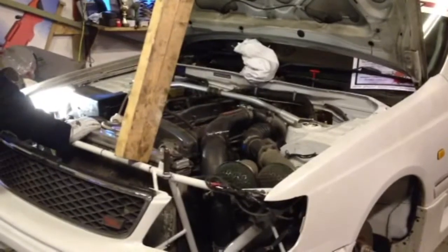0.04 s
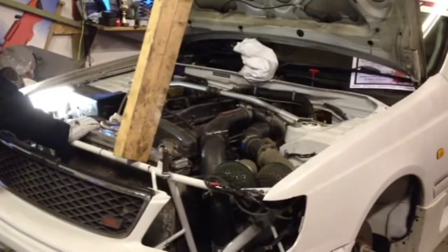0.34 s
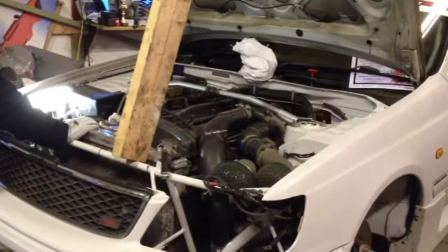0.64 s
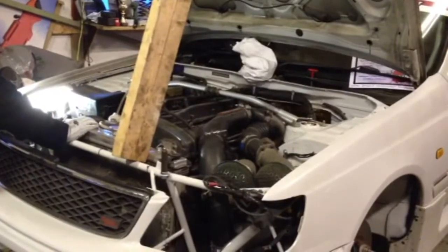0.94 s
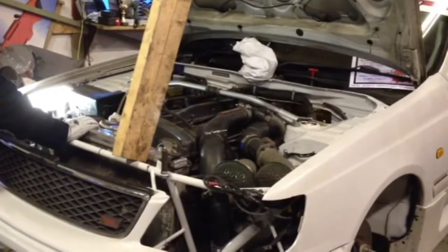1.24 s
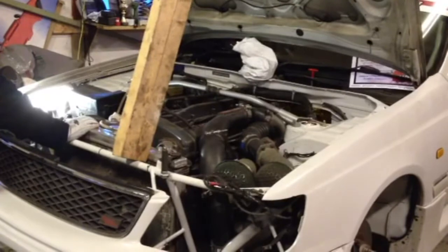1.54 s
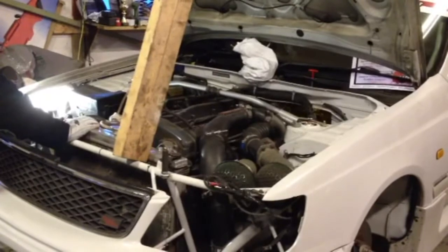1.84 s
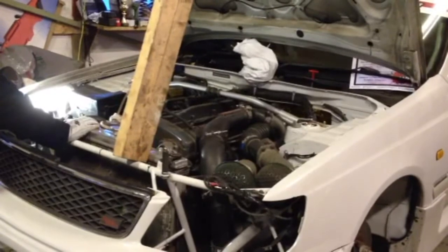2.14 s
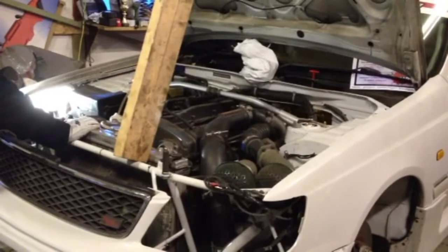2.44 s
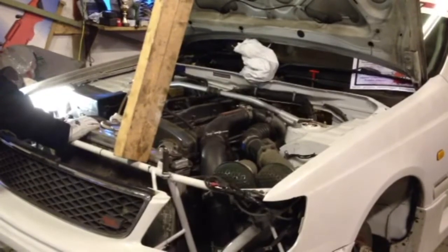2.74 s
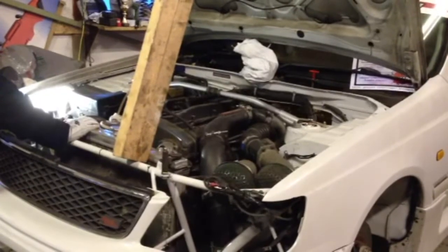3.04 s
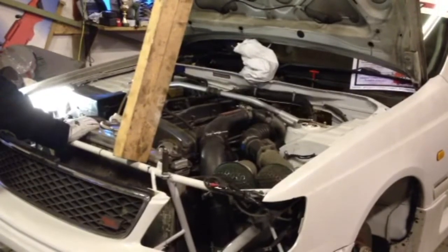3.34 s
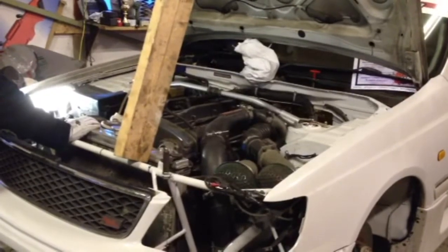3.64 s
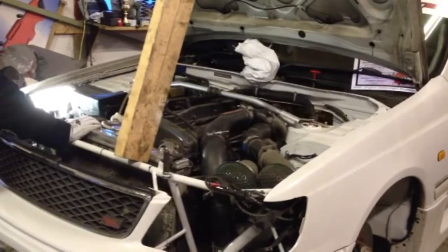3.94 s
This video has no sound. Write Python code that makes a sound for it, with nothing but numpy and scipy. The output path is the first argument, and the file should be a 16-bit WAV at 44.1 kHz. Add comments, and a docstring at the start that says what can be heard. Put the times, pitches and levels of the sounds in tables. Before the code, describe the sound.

A starter motor cranks a car engine in a garage, heard beside the open hood. First the ignition key clicks on and off and a fuel pump whines faintly, then the starter clunks in and turns with rapid, rattling pulses.

```python
"""A starter motor cranks a car engine in a garage, heard over the open bonnet.
The solenoid slams the pinion in; gear teeth rattle the engine's metal and labour against each
compression as the speed rises. Before that, a fuel pump whines, the key clicks on and off twice
and two soft scuffs pass. Room air and faint whistles lie underneath."""
import sys
import numpy as np
from scipy import signal
from scipy.fft import rfft, irfft
from scipy.io import wavfile

SR = 44100
rng = np.random.default_rng(int(sys.argv[2]) if len(sys.argv) > 2 else 0)


def to_wav(s):
    """Save 16-bit WAV."""
    ch = np.atleast_2d(s).T  # columns
    pcm = np.round(np.clip(ch, -1, 1) * 32767)  # PCM
    wavfile.write(sys.argv[1], SR, pcm.astype(np.int16))


N = 176400
T = np.arange(N) / SR

# cranking (time [s], unloaded tooth rate [Hz], gear level [dB])
CRANKING = [(2.5, 504, -26.5), (2.53, 601, -19.5), (2.61, 640, -26.5), (2.72, 1000, -24), (2.79, 1200, -23),
            (2.87, 1260, -27), (2.94, 1260, -26.5), (3.15, 1340, -25), (3.44, 1380, -24.5),
            (3.85, 1470, -25.5), (3.92, 1470, -23), (4, 1498, -23.5)]
# compression strokes (time [s], level [dB], length [s])
COMPRESSIONS = [(2.756, -24.5, .06), (2.922, -22.5, .038), (3.055, -21, .028), (3.178, -20.5, .036),
                (3.297, -25, .04), (3.413, -21, .044), (3.521, -18.5, .031), (3.64, -22, .033),
                (3.749, -21.5, .029), (3.86, -21.5, .042), (3.971, -34.5, .02)]
# bright rattle (time [s], level [dB])
RATTLE_LEVEL = [(2.5, -24), (2.62, -40), (2.71, -33), (2.85, -35), (2.9, -27), (3.05, -27), (3.22, -25),
                (3.5, -26), (3.88, -26), (3.925, -20.5), (4, -23)]
# solenoid and pinion blows (time [s], level [dB])
SOLENOID_BLOWS = [(2.507, -45), (2.518, -16.5), (2.537, -23.5)]
# relays closing, key on (time [s], level [dB])
RELAY_SNAPS = [(0.353, -29), (0.59, -30)]
# relays opening, key off (time [s], level [dB])
RELAY_RELEASES = [(.477, -40.5), (.72, -40.5)]
# car body knocks (time [s], level [dB])
BODY_KNOCKS = [(0.31, -43), (.356, -42.5), (0.488, -40.5), (0.526, -43), (0.598, -39.5), (.729, -39),
               (0.767, -44.5), (1.19, -50.5), (2.397, -51)]
# soft rubs (time [s], level [dB], centre [Hz])
SOFT_SCUFFS = [(2.335, -55.5, 3200), (2.395, -60, 8000)]
# pump tones (shaft rate multiple [1], relative level [dB])
PUMP_HARMONICS = [(1, -8.5), (2, -4.5), (4, -4.5), (8, -1), (12, -12), (16, -8.5)]
# pump whine (time [s], level [dB])
PUMP_ENVELOPE = [(.33, -60), (.42, -59), (.76, -60.5), (.86, -60), (1.4, -61), (1.5, -62.5), (1.6, -60),
                 (2.25, -60), (2.45, -61)]
# faint whistles (frequency [Hz], level [dB])
WHISTLE_TONES = [(119.5, -71.5), (549, -66), (5367, -72.5), (11714, -75.5)]

# source spectra (frequency [Hz], relative gain [dB])
GEAR_SPECTRUM = [(25, -47), (62, -30), (90, -33), (140, -13), (250, -7), (660, -5), (790, -6.5), (1000, -3),
                 (1500, 0), (2000, 0), (3600, -1), (4100, -6.5), (5400, -6), (8000, -12.5), (10000, -21),
                 (15500, -30)]
GRIND_SPECTRUM = [(60, -41), (200, -14), (400, -10), (620, -5.5), (790, -7.5), (1000, -7.5), (1290, 0),
                  (1520, -2.5), (2100, -4.5), (3300, -6.5), (4300, -6.5), (7800, -16.5), (10000, -25),
                  (15000, -35)]
THUD_SPECTRUM = [(25, -41), (45, -36), (65, -16), (90, -34), (130, -14), (200, 1.5), (400, 4), (630, -2.5),
                 (900, -47), (3000, -72)]
RATTLE_SPECTRUM = [(500, -38), (2000, -0.5), (3300, -1), (4500, -6.5), (6200, 3.5), (8000, -1), (9000, -5),
                   (10200, -11), (12500, -10.5), (15500, -19)]
SOLENOID_SPECTRUM = [(50, -54), (90, -28), (200, -9), (450, -4), (700, -14), (1300, -5), (2000, -10.5),
                     (3200, -2), (4300, -7.5), (5500, -12), (6300, -3), (7900, -17), (9500, -8.5),
                     (11000, -21), (12500, -11), (15200, -26)]
SNAP_SPECTRUM = [(60, -45), (200, -26), (400, -6), (750, -15), (1080, 0), (1500, -15), (1900, -2.5),
                 (2500, -7.5), (3100, 1.5), (3900, -3), (4600, -9), (8500, -21.5), (10500, -23.5),
                 (12800, -13), (15300, -27)]
RELEASE_SPECTRUM = [(200, -17), (1000, -9), (2500, 0), (4700, 0), (6500, -3.5), (8300, -3.5), (10500, -13),
                    (13000, -10), (15300, -22)]
KNOCK_SPECTRUM = [(60, -40), (180, -10), (320, 4.5), (600, -2.5), (790, -14), (2200, -14), (8000, -46)]
AIR_SPECTRUM = [(25, -33), (42, -28), (60, -17), (78, -20), (120, -17), (155, -12), (200, 1.5), (310, -6),
                (390, 0), (500, -2), (620, -9.5), (780, -10.5), (1500, -12), (2000, -13), (2700, -18),
                (6800, -14.5), (8500, -23), (15300, -28)]
# engine metal and car body resonances (frequency [Hz], width [Hz], lift [dB])
ENGINE_MODES = [(371, 6.2, 13.5), (631, 24, 7), (1000, 36, 7), (1783, 56, 3.5), (1862, 31, 4),
                (2054, 21, 7), (2140, 110, 5), (2360, 45, 1.5), (2736, 40, 5), (3273, 80, 5.5),
                (3510, 41, 6), (3748, 58, 5.5), (4665, 110, 7), (5460, 63, 6), (6100, 78, 0), (6900, 14, 3),
                (7700, 67, 10), (7800, 30, 5.5), (8460, 36, 10.5)]
BODY_MODES = [(356, 60, 4), (592, 76, 6.5)]
# garage decay (frequency [Hz], T60 [s])
GARAGE_T60 = [(100, 0.42), (500, 0.54), (2000, 0.41), (3500, 0.37), (7000, 0.27), (15000, 0.25)]


def starter(start_s=2.504):
    """Meshing teeth strike the metal; each compression slows them and makes them grind harder."""
    running = burst(start_s, .011, 2, 1)
    effort = sum(amp(db) * burst(s, .0043, length_s, .0088) for s, db, length_s in COMPRESSIONS)
    teeth = tooth_cycles()
    contact = unit(.47 + np.exp(-(teeth % 1) / .12))  # one pulse per tooth
    mesh = unit(contact * grains(14000, 2.7) * amp(flutter(2, 113)))
    gear_gain = running * amp(curve(CRANKING, column=2) + flutter(1.75, 47))
    gears = colour(gear_gain * mesh, GEAR_SPECTRUM, ENGINE_MODES)
    grind_force = effort * contact * grains(9000, 4.5) * amp(flutter(1.8, 100))
    grind = colour(grind_force, GRIND_SPECTRUM, ENGINE_MODES)
    return gears + grind + gear_whine(teeth, effort, running) + thuds(effort) + rattle(running)


def tooth_cycles(sag_depth=.17, sag_onset_s=.042, ease_per_s=.75):
    """Teeth passed. Speed sags on each compression, less as the engine gains momentum."""
    strokes = sum(burst(s, sag_onset_s, length_s + .015, .022) for s, _, length_s in COMPRESSIONS)
    load = strokes * np.exp(-ease_per_s * (T - COMPRESSIONS[1][0]))
    tooth_hz = curve(CRANKING) * (1 - sag_depth * np.minimum(load, 1))
    return np.cumsum(tooth_hz * (1 + .008 * drift(80))) / SR


def gear_whine(teeth, effort, running, loaded_db=-29.5, free_db=-44):
    """Tone at the tooth rate, louder under compression."""
    tone = unit(np.sin(2 * np.pi * teeth)) * amp(flutter(6.1, 63))
    return tone * (amp(loaded_db) * effort / effort.max() + amp(free_db) * running)


def thuds(effort, growth_db_per_s=8.5):
    """One low thud per compression, swelling over time."""
    swell = amp(-12.5 + growth_db_per_s * (T - COMPRESSIONS[5][0]))
    return colour(effort * swell * grains(4000, 2.2), THUD_SPECTRUM)


def rattle(running):
    """Dense small impacts ring the engine's metal."""
    gain = running * amp(curve(RATTLE_LEVEL) + flutter(4.26, 41))
    return colour(gain * grains(8000, 6.8), RATTLE_SPECTRUM, ENGINE_MODES)


def solenoid():
    """The plunger moves; the pinion slams into the ring gear."""
    blows = bursts(SOLENOID_BLOWS, .003, .0045, .0085) * grains(12000, 1.9)
    return colour(blows, SOLENOID_SPECTRUM)


def ignition_key():
    """Relay contacts chatter briefly; the body answers with dull knocks."""
    snaps = bursts(RELAY_SNAPS, .006, .019, .0026) * grains(9300, 3.6)
    releases = bursts(RELAY_RELEASES, .004, .0096, .023) * grains(9000, 3.3)
    knocks = bursts(BODY_KNOCKS, .003, .015, .0092) * grains(2500, 3.2)
    clicks = colour(snaps, SNAP_SPECTRUM) + colour(releases, RELEASE_SPECTRUM)
    body = colour(knocks, KNOCK_SPECTRUM, BODY_MODES)
    return garage(clicks, wet_db=-3.5) + garage(body, wet_db=-1)


def scuffs():
    """Soft rubbing just before the starter engages."""
    rubs = np.zeros(N)
    for s, db, hz in SOFT_SCUFFS:
        friction = amp(db) * burst(s, .02, .044, .024) * grains(7400, 4)
        rubs += colour(friction, [(hz / 4, -18), (hz, 0), (hz * 2, -12)])
    return rubs


def fuel_pump(shaft_hz=240.95, stop_s=2.46):
    """Wavering shaft harmonics; stops just before cranking."""
    turns = np.cumsum(shaft_hz * (1 + .0006 * drift(7.5))) / SR
    whine = sum(amp(db + .5 * drift(20)) * np.sin(2 * np.pi * (k * turns + rng.random()))
                for k, db in PUMP_HARMONICS)
    powered = burst(-1, .01, 1 + stop_s, .017)
    return np.sqrt(2) * whine * amp(curve(PUMP_ENVELOPE)) * powered


def whistles():
    """Faint tones, wandering in level and phase."""
    return np.sqrt(2) * sum(amp(db + 2.2 * drift(6.2)) * np.sin(2 * np.pi * hz * T + .6 * drift(15))
                            for hz, db in WHISTLE_TONES)


def room_air(level_db=-54.5):
    """Soft noise, slowly wavering."""
    return amp(level_db + .86 * drift(1.7)) * colour(rng.standard_normal(N), AIR_SPECTRUM)


def garage(x, wet_db, predelay_samples=130):
    """Adds dense reflections; each band decays at its own rate."""
    hz, t, bands = signal.stft(rng.standard_normal(SR // 2), SR, nperseg=256)
    decay = amp(-60 * t / at_hz(GARAGE_T60, hz)[:, None])
    tail = signal.istft(bands * decay, SR, nperseg=256)[1]
    tail[:predelay_samples] = 0
    wet = signal.fftconvolve(x, tail / np.linalg.norm(tail))[:N]
    return (x + amp(wet_db) * wet) / np.sqrt(1 + amp(wet_db) ** 2)


def amp(db):
    """dB to gain."""
    return 10 ** (np.asarray(db) / 20)


def unit(x):
    """Scales to rms 1."""
    return x / np.sqrt(np.mean(x ** 2) + 1e-20)


def at_hz(points, hz):
    """Table lookup, log-frequency axis."""
    f, value = np.transpose(points)
    return np.interp(np.log(hz + 1), np.log(f + 1), value)


def curve(points, column=1):
    """Time table column, per sample."""
    columns = np.transpose(points)
    return np.interp(T, columns[0], columns[column])


def drift(cutoff_hz):
    """Low-passed random wander, rms 1."""
    f = np.fft.rfftfreq(N, 1 / SR)
    return unit(irfft(rfft(rng.standard_normal(N)) / (1 + (f / cutoff_hz) ** 4), N))


def flutter(limit_db, cutoff_hz):
    """Bounded level wander [dB]."""
    return limit_db * np.tanh(drift(cutoff_hz))


def colour(x, spectrum, modes=()):
    """Minimum-phase filter, energy 1: broad spectrum plus resonances."""
    f = np.fft.rfftfreq(8192, 1 / SR)
    lift = 1 + sum((amp(db) ** 2 - 1) / (1 + (2 * (f - hz) / width_hz) ** 2)
                   for hz, width_hz, db in modes)
    log_gain = np.log(amp(at_hz(spectrum, f))) + .5 * np.log(np.maximum(lift, 1e-3))
    log_response = signal.hilbert(np.r_[log_gain, log_gain[-2:0:-1]]).conj()
    taps = np.fft.ifft(np.exp(log_response)).real[:4096]
    return signal.fftconvolve(x, taps / np.linalg.norm(taps))[:N]


def grains(per_s, scatter_db):
    """Random tiny impacts of uneven size, rms 1."""
    impacts = (rng.random(N) < per_s / SR) * rng.choice([-1, 1], N)
    return unit(impacts * amp(scatter_db * rng.uniform(-1, 1, N)))


def burst(start_s, rise_s, hold_s, fall_s):
    """Linear rise; exponential fall from start_s + hold_s."""
    age_s = T - start_s
    return np.clip(age_s / rise_s, 0, 1) * np.exp(-np.maximum(age_s - hold_s, 0) / fall_s)


def bursts(events, rise_s, hold_s, fall_s):
    """One burst per (time [s], level [dB])."""
    return sum(amp(db) * burst(s, rise_s, hold_s, fall_s) for s, db in events)


def scene():
    """Mono mix beside the engine bay."""
    quiet_layers = room_air() + fuel_pump() + whistles() + ignition_key() + scuffs()
    return (quiet_layers + garage(solenoid() + starter(), wet_db=-6))[None]


def record(dry):
    """Low-pass at 15450 Hz."""
    taps = signal.firwin(511, 15450, window=("kaiser", 9), fs=SR)
    return signal.oaconvolve(dry, taps[None], "same")


dry = scene()
out = record(dry)
to_wav(out)
```